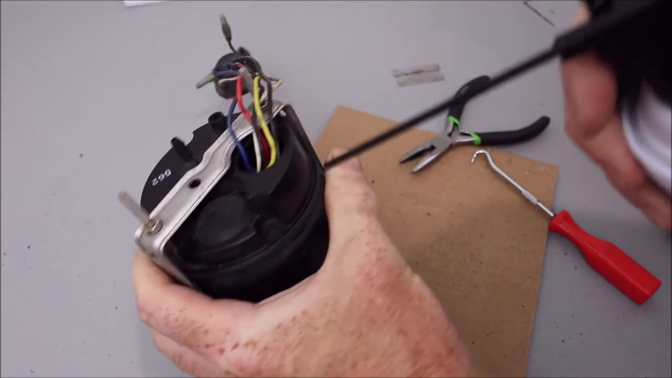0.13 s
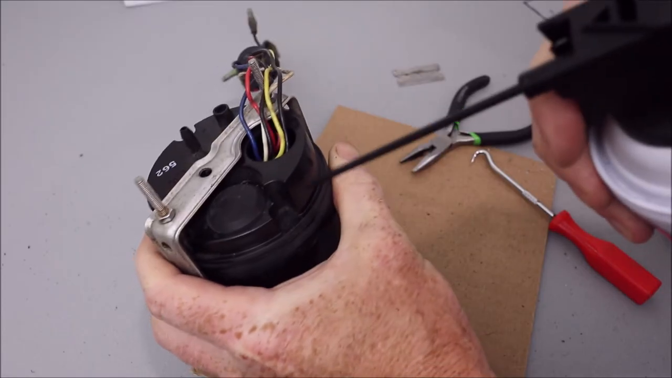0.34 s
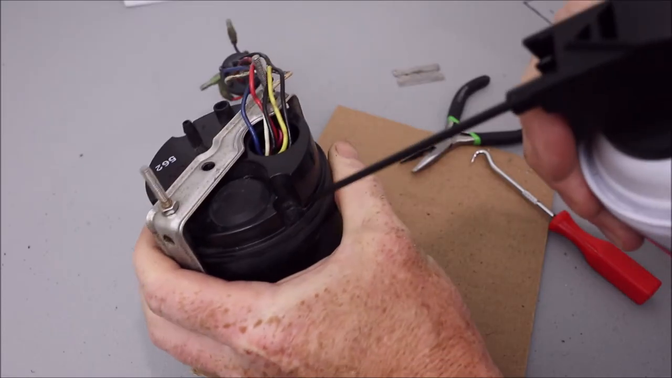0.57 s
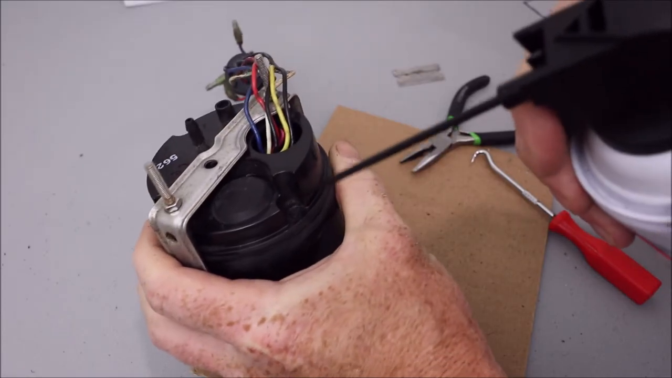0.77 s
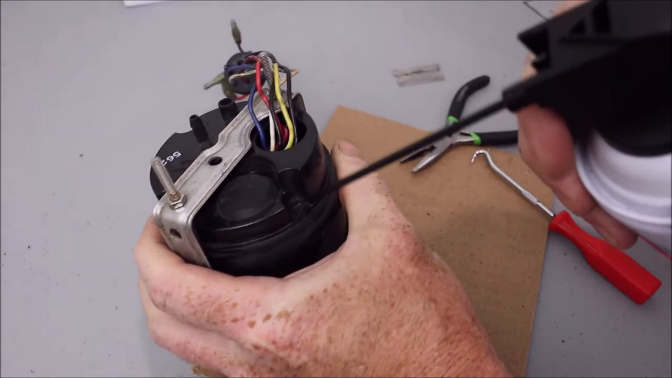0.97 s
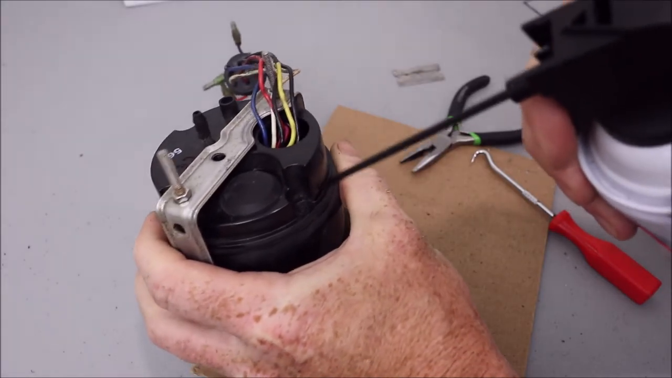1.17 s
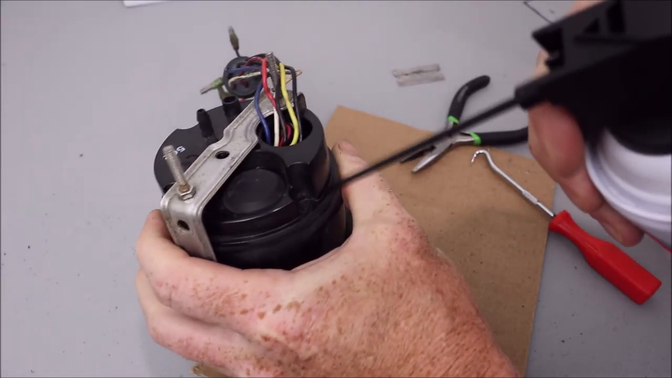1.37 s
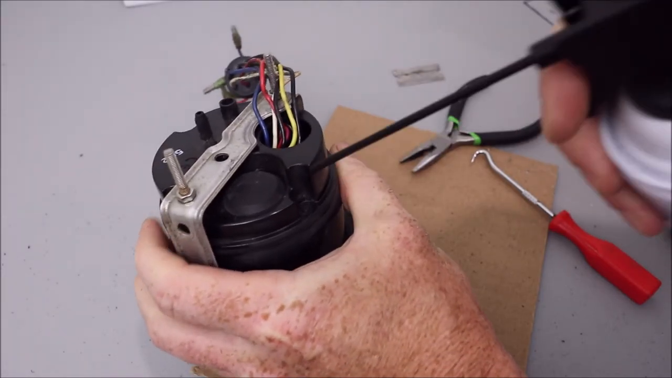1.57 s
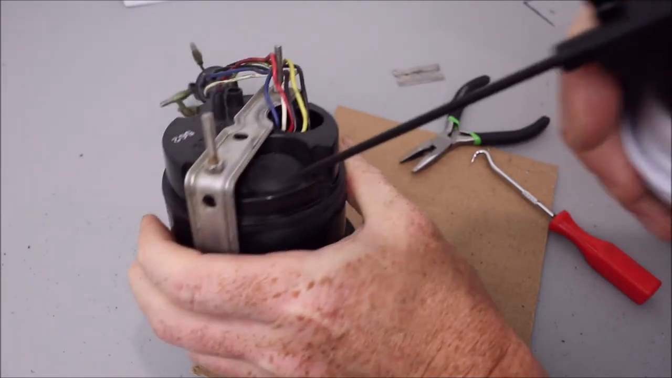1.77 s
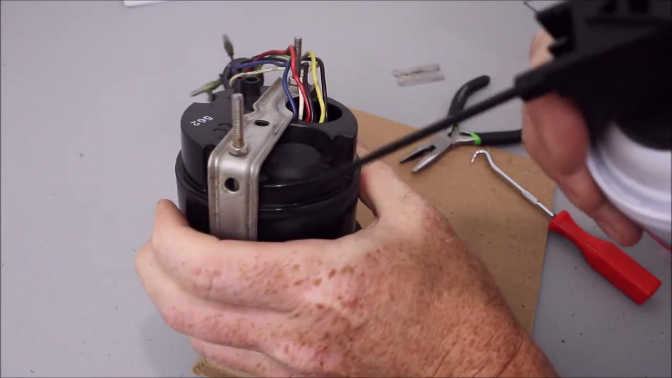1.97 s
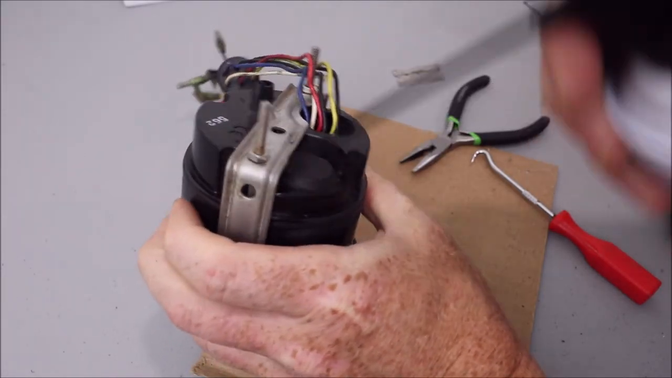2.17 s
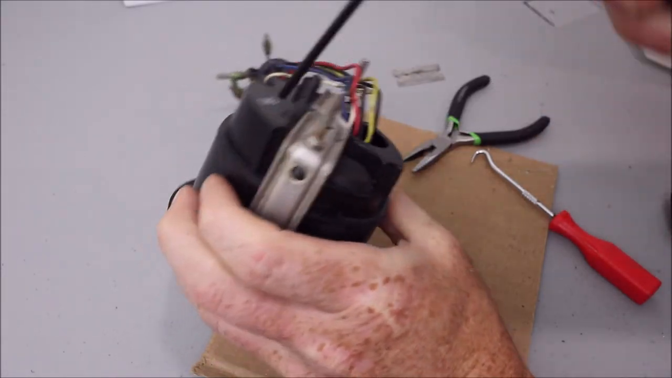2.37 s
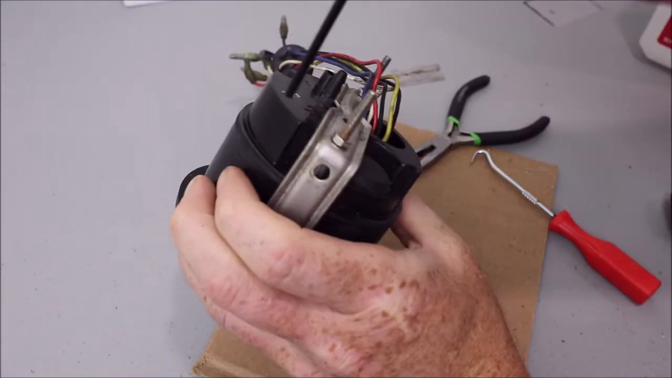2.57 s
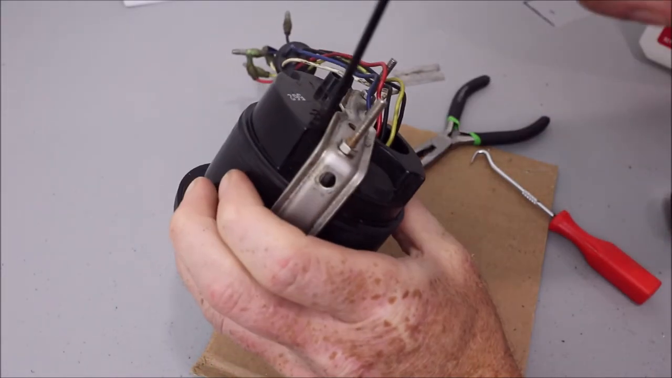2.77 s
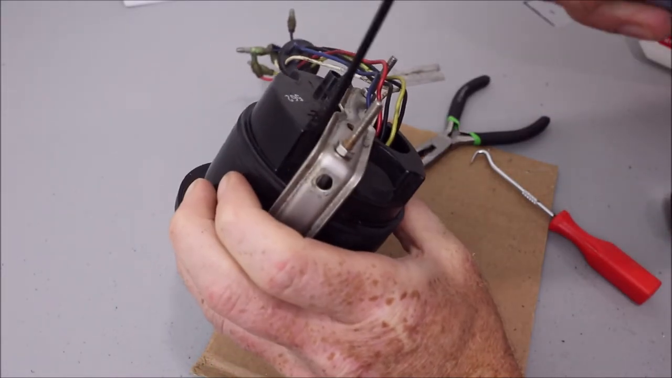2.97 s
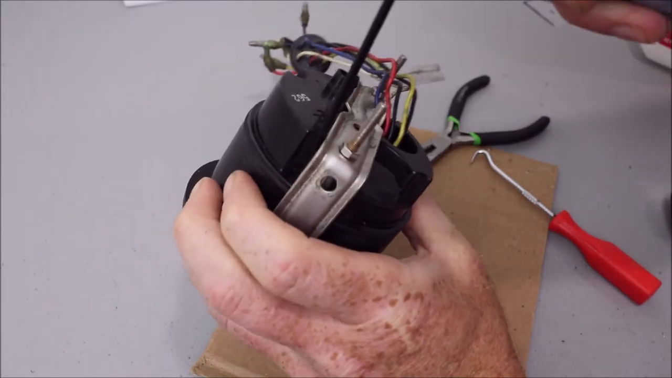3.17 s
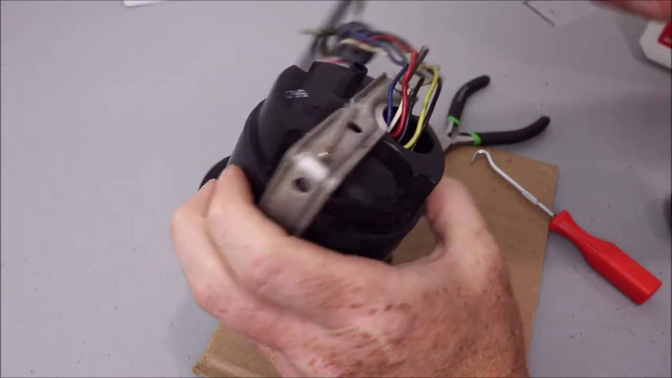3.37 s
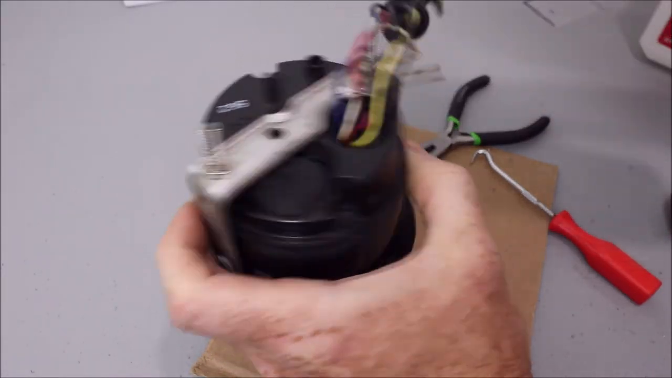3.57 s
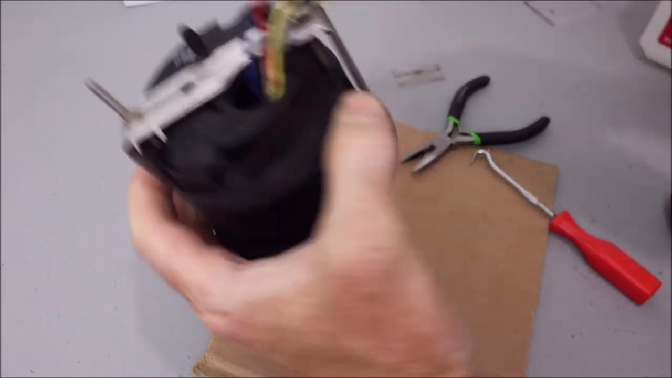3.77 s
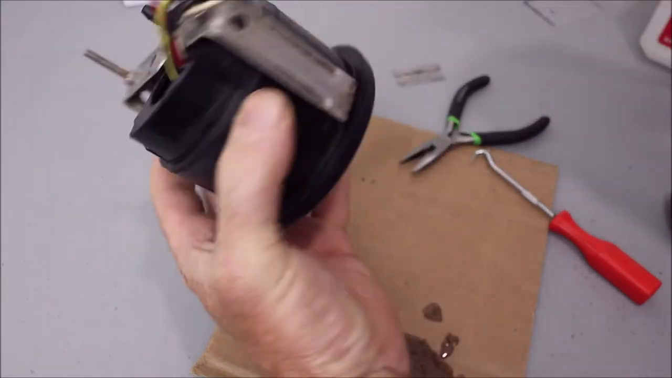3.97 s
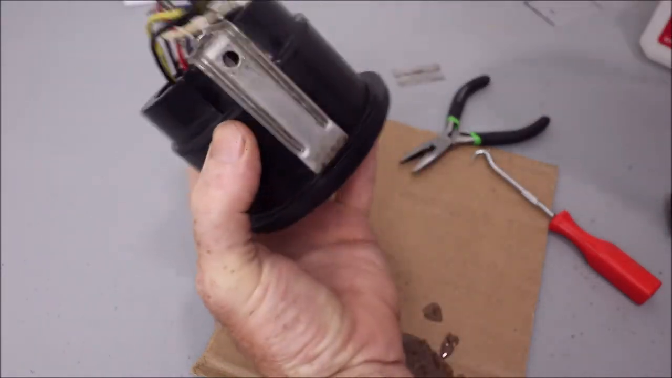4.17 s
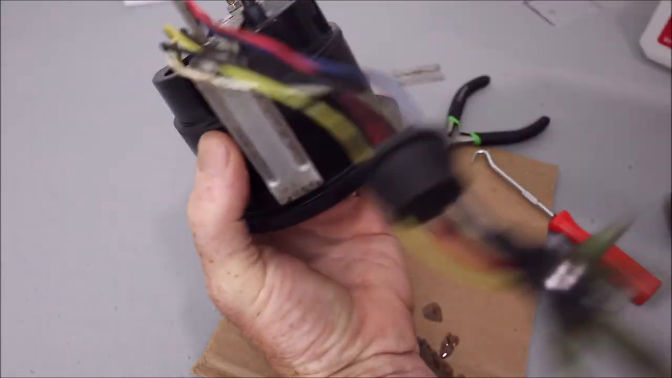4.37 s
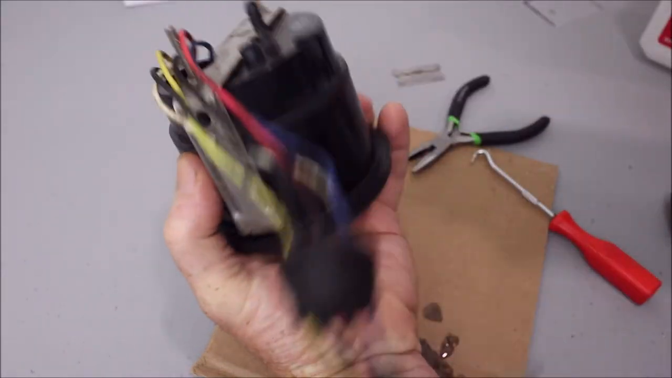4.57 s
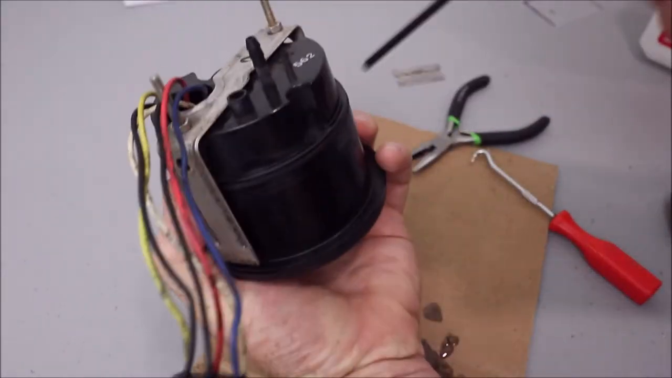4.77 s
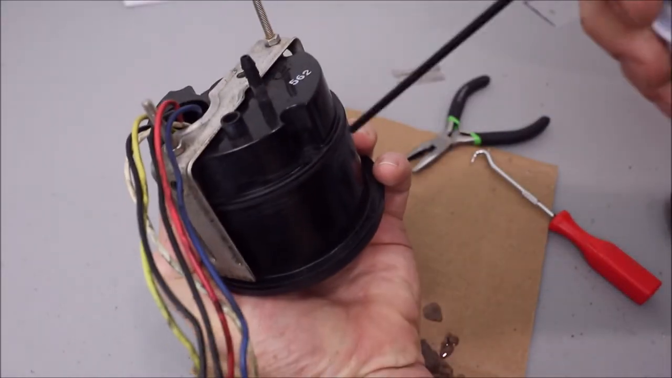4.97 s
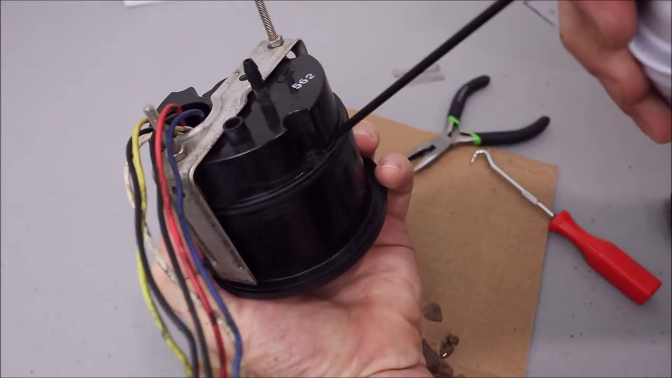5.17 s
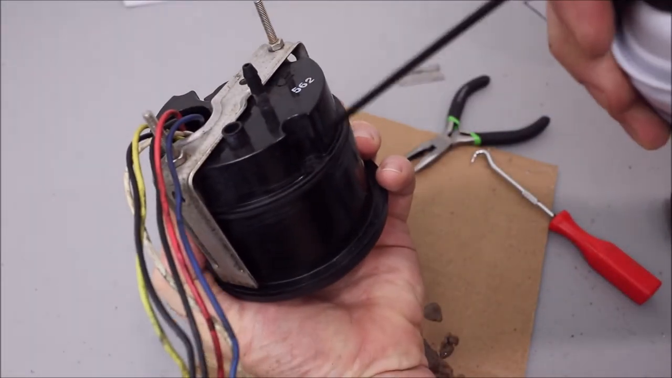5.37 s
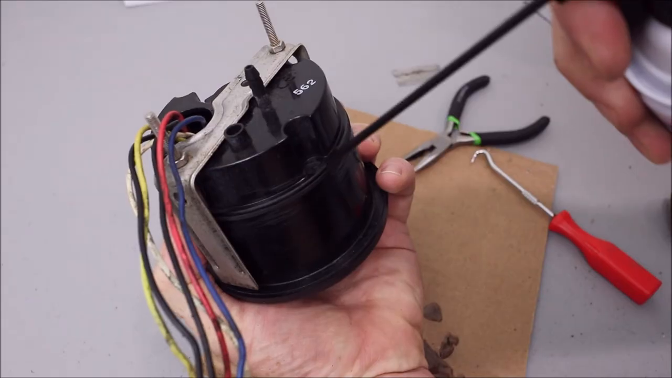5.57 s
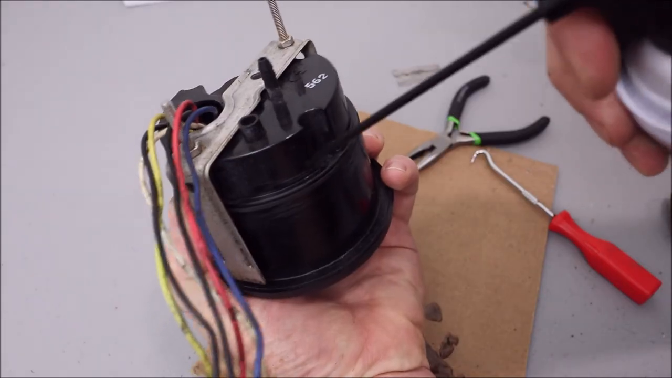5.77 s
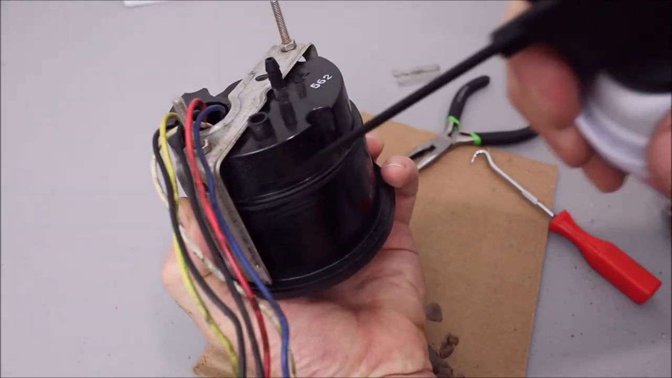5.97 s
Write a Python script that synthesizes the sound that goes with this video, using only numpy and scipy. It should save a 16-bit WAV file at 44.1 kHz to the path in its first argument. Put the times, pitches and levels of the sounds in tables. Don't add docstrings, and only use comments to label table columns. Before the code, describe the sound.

Close at a workbench in a small room, a compressed air can fires a string of short, bright hisses at a hollow plastic part, then two more puffs, a brief pause and a longer blast. Loose wires tick and a palm rubs the shell as it turns. Four further bursts follow, lengthening, with soft low air thumps on the stereo microphone and faint ventilation hum in the gaps.

```python
import sys
import numpy as np
from scipy import signal
from scipy.fft import rfft, irfft, next_fast_len
from scipy.io import wavfile
from scipy.ndimage import uniform_filter1d, map_coordinates

SR = 44100
rng = np.random.default_rng(int(sys.argv[2]) if len(sys.argv) > 2 else 0)


def gain_from_db(level_db):
    decades = np.asarray(level_db, float) / 20
    return 10 ** decades


def to_wav(s):
    ch = np.atleast_2d(s).T
    pcm = np.round(np.clip(ch, -1, 1) * 32767)
    wavfile.write(sys.argv[1], SR, pcm.astype(np.int16))


N = 265923

# start in seconds, opening time in seconds, release in seconds after start,
# flow in dB, closing t60 in seconds.
PULLS_S_DB = [(0.0, 0.00197, 0.0038, -62, 0.22), (0.296, 0.0383, .092, -18.5, 0.098),
              (0.482, .024, 0.11, -20, .1), (.69, 0.028, 0.13, -21, .1), (.885, 0.019, 0.13, -20.5, 0.18),
              (1.084, 0.033, 0.12, -25.5, .1), (1.189, .055, 0.067, -20.5, .08),
              (1.301, 0.027, 0.13, -19, 0.13), (1.808, 0.022, 0.099, -19, 0.15),
              (1.975, 0.06, 0.13, -20, 0.073), (2.65, 0.031, 0.14, -19.5, 0.042),
              (2.853, .027, .35, -20, 0.11), (4.836, 0.014, 0.16, -19, 0.05),
              (5.051, 0.017, 0.16, -20.5, .6), (5.252, .115, 0.27, -21.5, .12),
              (5.665, 0.026, 0.098, -26, .2), (5.69, 0.1, 0.31, -21, 0.31)]
# time in seconds, pocket pitch in Hz, flow into pocket, across edges, over cup in dB.
AIM_S_HZ_DB = [(.04, 4915, -0.5, -30, 13), (0.331, 6450, 6.5, -1, -15), (0.549, 5790, 2.5, 2.5, -13),
               (.78, 5590, -11, 0, -15.5), (.98, 5390, -12.5, 0.5, -14.5), (1.2, 5500, -10.5, 0, -10),
               (1.4, 5000, 0, 1, -9.5), (1.88, 5490, 7, -6.5, -15), (2.07, 5330, 0.5, -3, -19),
               (2.72, 5650, 9, -17, -24), (3.05, 5630, 7, -1.5, -24), (3.19, 6030, 5.5, 2, -21.5),
               (4.86, 6290, -3.5, 1.5, -20), (5.1, 6320, 3, 0.5, -16.5), (5.4, 6300, 1.5, 2, -13.5),
               (5.5, 5000, -14.5, -2, -16), (5.75, 4250, 2, -8, -14.5), (5.97, 4890, 5.5, -3, -17.5)]
# frequency in Hz, level in dB per Hz.
JET_HZ_DB = [(60, -65), (200, -35.5), (500, -18), (1000, -16), (2000, -4.5), (3500, -1), (6000, -3.5),
             (10000, -14), (16000, -26)]
# frequency in Hz, level in dB per Hz.
EDGE_HZ_DB = [(2000, -36.5), (5000, -8.5), (8000, 0.5), (10500, -4), (13000, -6), (14500, -13),
              (16000, -12.5)]
# frequency in Hz, width in Hz, level in dB.
CUP_HZ_DB = [(260, 250, -4.5), (426.2, 99, 3.5), (518, 140, -2.5)]
# frequency in Hz, width in Hz, level in dB.
SLOT_HZ_DB = [(764, 260, 0), (958, 170, 3), (1204, 260, -9)]
# frequency in Hz, t60 in seconds.
ROOM_HZ_T60_S = [(200, 0.28), (2000, 0.36), (6000, 0.35), (10000, 0.37), (14000, 0.2)]
# frequency in Hz, level in dB per Hz.
VENT_HZ_DB = [(30, -26), (200, -8.5), (290, 1.5), (350, -7), (490, 2), (860, -8), (1640, -14), (1900, -13),
              (4500, -21.5), (8500, -26.5), (10000, -34.5), (15000, -59)]
# frequency in Hz, width in Hz, level in dB.
RUMBLE_HZ_DB = [(70, 50, -17.5), (126, 15, -1.5), (204, 120, -11)]
# time in seconds, level in dB.
FAN_S_DB = [(0, -72.5), (.25, -71), (1.75, -65.5), (2.45, -76), (2.64, -71), (3.5, -73.5), (3.95, -70),
            (4.3, -58), (4.8, -59), (5.2, -67)]
# time in seconds, peak in dB, pitch in Hz, length in seconds, hardness in dB.
TICKS_S_DB_HZ = [(0.066, -51, 2600, 0.0092, -22), (.19, -55, 2650, 0.011, -21.5),
                 (.255, -53, 2000, 0.056, -15), (1.781, -42, 2040, 0.04, -25),
                 (3.38, -34.5, 2030, 0.037, -27.5), (3.385, -38, 2750, 0.031, -26),
                 (3.444, -48.5, 2360, 0.029, -16), (3.503, -42.5, 1970, 0.014, -5),
                 (3.549, -61, 2440, 0.1, -35), (3.637, -53.5, 2380, .07, -4),
                 (3.902, -42.5, 2270, 0.024, -6), (3.971, -52, 3250, 0.032, -22),
                 (3.977, -44, 1915, 0.03, -24), (4.038, -37.5, 1960, 0.049, -13.5),
                 (4.092, -37.5, 1900, 0.014, -8), (4.117, -38, 2120, 0.053, -12),
                 (4.439, -40, 1810, 0.02, -21), (4.63, -55, 3310, 0.027, -2.5),
                 (4.823, -39, 1960, 0.026, -23)]
# time in seconds, peak in dB, pitch in Hz.
PUFFS_S_DB_HZ = [(0.4, -53, 150), (0.599, -49, 149), (0.739, -59, 150), (1.248, -37, 154), (1.46, -49, 150),
                 (1.847, -39, 153), (3.228, -64, 150), (4.855, -35, 152), (5, -38, 155), (5.197, -32, 155),
                 (5.38, -40.5, 151), (5.549, -44.5, 152), (5.72, -38, 154)]
# time in seconds, level in dB.
TURNING_S_DB = [
    (1.5, -75),
    (1.75, -68),
    (1.9, -85.5),
    (3.3, -88.5),
    (3.5, -63.5),
    (4.1, -59),
    (4.3, -63),
    (4.6, -84),
]
# frequency in Hz, level in dB per Hz.
SKIN_HZ_DB = [(150, -26), (500, -0.5), (1500, -1.5), (2600, -4.5), (5000, -16), (9000, -26.5),
              (12000, -60.5)]
# delay in ms, level in dB.
ECHOES_MS_DB = [(2.1, -26.5), (4.7, -20.5), (7.3, -17), (11.2, -17), (13.7, -16)]
# frequency in Hz, correlation from -1 to 1.
NEAR_HZ_ALIKE = [(35, 0.29), (90, 0.78), (180, .94), (700, 0.91), (1400, 0.88), (2800, 0.47), (5600, -0.12),
                 (10000, -0.45), (14500, -0.24)]
# frequency in Hz, correlation from -1 to 1.
DIFFUSE_HZ_ALIKE = [(60, 1), (640, 0.99), (1400, 0.84), (3100, -0.11), (6800, -0.74), (10000, -0.79),
                    (15000, -0.64)]
# frequency in Hz, share of the side that is the mid leading.
LEAD_HZ_SHARE = [(1500, 0.022), (2200, .3), (3000, .4), (4500, 0.63), (7500, .45), (11000, .1)]
# frequency in Hz, left minus right in dB.
TILT_HZ_DB = [(60, -3.5), (110, 1.5), (200, -0.5), (380, -0.5), (700, -0.5), (1290, 0.5), (2380, -0.5),
              (4400, 0), (8120, 1.5), (15000, 2)]
# frequency in Hz, gain in dB.
BAND_HZ_DB = [(40, -3), (90, 0), (15000, 0), (15400, -7), (15900, -12), (15950, -120)]

OPENING_POWER, SAG_DB_PER_S = 1.74, -1
SURGE_DB, SURGE_S, SNAP_S = 5, 0.0084, 0.0088
POCKET_WEIGHT, EDGE_WEIGHT = 0.41, 1.08
ROAM_DB, ROAM_PER_S = 2.02, 16
SLOT_DB, SLOT_FOLLOWS = -6.5, 0.47
PASS_S, PASS_HALF_S, PASS_DB = 1.178, 0.035, 15
VENT_DB, DUCK_DB, RECOVER_S, LAST_BLAST_S = -53, 20.5, 0.81, -0.35
PALM_START_S, PALM_END_S = 3.95, 4.2
BELLY_LOOSE_DB, BELLY_HELD_DB = -2, -25
SOFT_HZ = 8000


def unit(x):
    return x / np.sqrt(np.mean(x ** 2) + 1e-20)


def along(points, hz):
    f, v = np.transpose(points)
    return np.interp(np.log(hz + 1), np.log(f + 1), v)


def spectrum(points):
    return lambda hz: gain_from_db(along(points, hz))


def wobble(rate_per_s):
    knots = rng.standard_normal(int(N * rate_per_s / SR) + 4)
    return map_coordinates(knots, [np.arange(N) * rate_per_s / SR])


def filtered(x, response):
    m = next_fast_len(N + SR // 8)
    return irfft(rfft(x, m) * response(np.fft.rfftfreq(m, 1 / SR)), m)[..., :N]


def resonances(modes):
    def response(f):
        total = 0
        for k, (hz, width_hz, db) in enumerate(modes):
            damping = 1j * f * width_hz
            total = total + (-1) ** k * gain_from_db(db) * damping / (hz * hz - f * f + damping)
        return total
    return response


def turbulence(response, patchy_db, moving=lambda hz, s: 1):
    hz, s, z = signal.stft(rng.standard_normal((2, N)), SR, nperseg=512)
    field = uniform_filter1d(rng.standard_normal(z.shape[1:]), size=6, axis=0)
    field = uniform_filter1d(field, size=8, axis=1)
    z = z * gain_from_db(patchy_db * unit(field)) * moving(hz[:, None], s)
    pair = signal.istft(z, nperseg=512)[1][:, :N]
    return unit(filtered(pair, response))


def flow():
    t, total = np.arange(N) / SR, np.zeros(N)
    for s, open_s, held_s, db, close_s in PULLS_S_DB:
        since_s = np.clip(t - s, 0, 1)
        past_s = np.clip(since_s - open_s, 0, 1)
        surge_db = SURGE_DB * min(SNAP_S / open_s, 1) ** 2 * np.exp(-past_s / SURGE_S)
        closing_db = -60 * np.clip(since_s - held_s, 0, 1) / close_s
        opening = np.clip(since_s / open_s, 0, 1) ** OPENING_POWER
        total += opening * gain_from_db(db + surge_db + SAG_DB_PER_S * past_s + closing_db)
    return total


def aim():
    t = np.arange(N) / SR
    s, *columns = np.transpose(AIM_S_HZ_DB)
    pitch_hz, pocket_db, edge_db, cup_db = [np.interp(t, s, c) for c in columns]
    pocket_db = pocket_db + ROAM_DB * wobble(ROAM_PER_S)
    edge_db = edge_db + 0.71 * ROAM_DB * wobble(ROAM_PER_S)
    cup_db = cup_db - 4.5 + ROAM_DB * wobble(ROAM_PER_S)
    pass_db = PASS_DB * np.exp(-((t - PASS_S) / PASS_HALF_S) ** 2)
    slot_db = SLOT_DB + SLOT_FOLLOWS * cup_db + pass_db + 0.36 * ROAM_DB * wobble(ROAM_PER_S)
    load = 1 + POCKET_WEIGHT * gain_from_db(2 * pocket_db) + EDGE_WEIGHT * gain_from_db(2 * edge_db)
    gains = flow() / np.sqrt(load) * gain_from_db([0 * t, pocket_db, edge_db, cup_db, slot_db])
    return gains, pitch_hz * gain_from_db(0.3 * wobble(ROAM_PER_S))


def free_jet():
    return gain_from_db(2.5) * turbulence(spectrum(JET_HZ_DB), patchy_db=2.0)


def pocket_whistle(pitch_hz):
    def moving(hz, s):
        centre_hz = np.interp(s * SR, np.arange(N), pitch_hz)
        return np.abs(resonances([(centre_hz, 0.34 * centre_hz, 0)])(hz)) / np.sqrt(centre_hz)
    return gain_from_db(0.5) * turbulence(np.ones_like, patchy_db=3.0, moving=moving)


def edge_fizz():
    return gain_from_db(4.5) * turbulence(spectrum(EDGE_HZ_DB), patchy_db=2.5)


def blown_cup():
    tone = turbulence(lambda hz: resonances(CUP_HZ_DB)(hz) ** 2, patchy_db=2.5)
    return gain_from_db(0.5 + 1.8 * wobble(40)) * tone


def blown_slot():
    tone = turbulence(lambda hz: resonances(SLOT_HZ_DB)(hz) ** 2, patchy_db=3.5)
    return gain_from_db(0.5 + 1.0 * wobble(40)) * tone


def air():
    gains, pitch_hz = aim()
    jet, pocket, edge, cup, slot = gains * gain_from_db(0.3 * wobble(25) + 0.44 * wobble(250))
    sound = jet * free_jet()
    sound += pocket * pocket_whistle(pitch_hz)
    sound += edge * edge_fizz()
    sound += cup * blown_cup()
    return sound + slot * blown_slot()


def room(pair):
    hz, t, z = signal.stft(np.pad(pair, ((0, 0), (250, 0))), SR, nperseg=256)
    keep = gain_from_db(-120 * t[1] / along(ROOM_HZ_T60_S, hz))
    energy = np.abs(z) ** 2
    stored = [signal.lfilter([1 - k], [1, -k], energy[:, i]) for i, k in enumerate(keep)]
    stored = np.stack(stored, axis=1)
    fresh = signal.stft(rng.standard_normal((2, N + 250)), SR, nperseg=256)[2]
    tail = np.sqrt(stored) * fresh / np.abs(fresh).std() / 2
    return signal.istft(tail, SR, nperseg=256)[1][:, :N]


def ventilation():
    t = np.arange(N) / SR
    ends_s = np.array([LAST_BLAST_S] + [s + held_s for s, _, held_s, _, _ in PULLS_S_DB[1:]])
    starts_s = np.array([-1] + [s for s, *_ in PULLS_S_DB[1:]])
    since_s = np.clip(t - ends_s[np.searchsorted(starts_s, t) - 1], 0, 9)
    draught_db = VENT_DB - DUCK_DB * np.exp(-since_s / RECOVER_S) + 4.0 + 0.68 * wobble(17.0)
    draught = gain_from_db(draught_db) * turbulence(spectrum(VENT_HZ_DB), patchy_db=2.5)
    fan_db = np.interp(t, *np.transpose(FAN_S_DB))
    return draught + gain_from_db(fan_db) * turbulence(resonances(RUMBLE_HZ_DB), patchy_db=0.1)


def wires():
    out, t = np.zeros((2, N + SR)), np.arange(SR // 4) / SR
    f = np.fft.rfftfreq(len(t), 1 / SR)
    for s, db, hz, length_s, hard_db in TICKS_S_DB_HZ:
        belly_db = BELLY_LOOSE_DB if PALM_START_S < s < PALM_END_S else BELLY_HELD_DB
        envelope = np.sin(np.pi * np.clip(t / length_s, 0, 1)) ** 2
        scrape = rng.standard_normal((2, len(t))) * envelope
        modes = [(hz / 2.05, 300, belly_db), (hz, 440, 0), (2 * hz, 800, hard_db - 3),
                 (1.5 * hz, 1600, 0.5 * hard_db - 4), (5500, 4500, 1.8 * hard_db - 4)]
        shell = sum(gain_from_db(mode_db) * resonances([(c, w, 0)])(f) ** 2 for c, w, mode_db in modes)
        ring = irfft(rfft(scrape) * shell / (1 + 1j * f / SOFT_HZ) ** 2, len(t))
        out[:, round(s * SR):][:, :len(t)] += gain_from_db(db) * ring / np.abs(ring).max()
    return out[:, :N]


def puffs():
    out, t = np.zeros((2, N + SR)), np.arange(SR // 8) / SR
    for s, db, hz in PUFFS_S_DB_HZ:
        noises = [uniform_filter1d(rng.standard_normal(len(t)), size=70) for side in range(2)]
        eddies = 0.52 * np.array([unit(noise) for noise in noises])
        envelope = gain_from_db(-60 * t / 0.03) * (1 - np.exp(-t / 0.0026))
        push = (np.sin(2 * np.pi * hz * t) + eddies) * envelope
        out[:, round(s * SR):][:, :len(t)] += gain_from_db(db + 5.5) * push
    return out[:, :N]


def palm():
    level_db = np.interp(np.arange(N) / SR, *np.transpose(TURNING_S_DB))
    return gain_from_db(level_db + 1.5 * wobble(30)) * turbulence(spectrum(SKIN_HZ_DB), patchy_db=2.5)


def ports(pair, alike):
    def response(hz):
        turn = np.arccos(np.clip(along(alike, hz), -1, 1)) / 2
        lead = np.clip(along(LEAD_HZ_SHARE, hz), -1, 1)
        mid = np.array([np.cos(turn), 0 * hz])
        side = np.sin(turn) * np.array([1j * lead, np.sqrt(1 - lead ** 2)])
        port_db = np.outer([0.5, -0.5], along(TILT_HZ_DB, hz)) + along(BAND_HZ_DB, hz)
        return np.array([mid + side, mid - side]) * gain_from_db(port_db)[:, None]
    return filtered(pair, response).sum(axis=1)


def echoes(pair):
    total = 0
    for ms, db in ECHOES_MS_DB:
        total = total + gain_from_db(db) * np.pad(pair, ((0, 0), (round(ms * SR / 1000), 0)))[:, :N]
    return total


def scene():
    bench = air() + wires() + palm()
    near = gain_from_db(-1.0) * (bench + echoes(bench))
    diffuse = gain_from_db(-9.0) * room(bench) + ventilation()
    return ports(near, NEAR_HZ_ALIKE) + ports(diffuse, DIFFUSE_HZ_ALIKE) + puffs()


def band_limit(x):
    return signal.sosfilt(signal.butter(12, 15940, fs=SR, output="sos"), x)


def record(dry):
    held = dry / (1 + np.abs(dry / 0.85) ** 6) ** (1 / 6)
    return band_limit(held)


dry = scene()
out = record(dry)
to_wav(out)
```